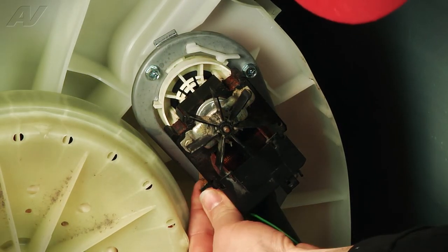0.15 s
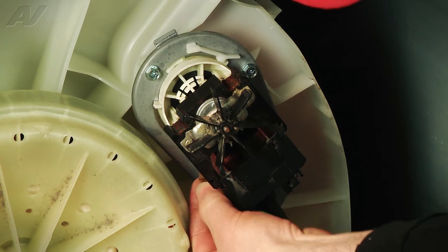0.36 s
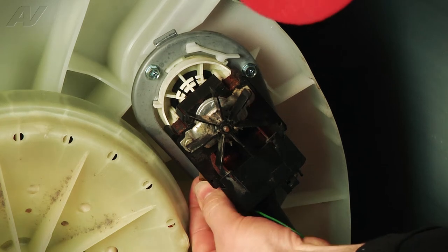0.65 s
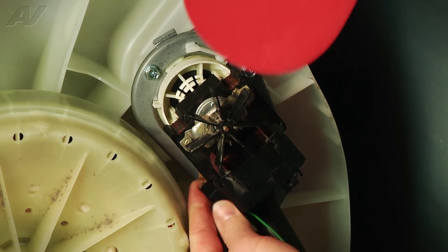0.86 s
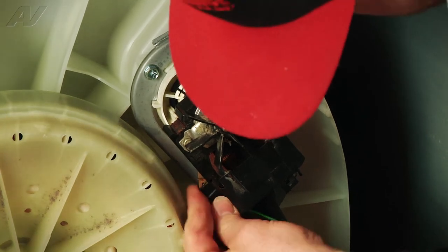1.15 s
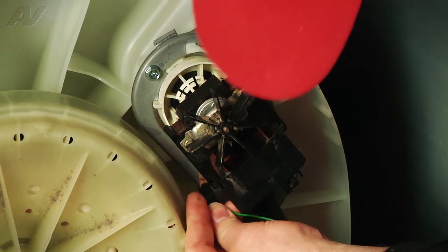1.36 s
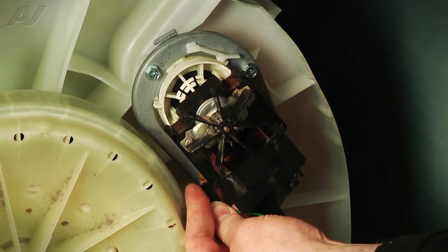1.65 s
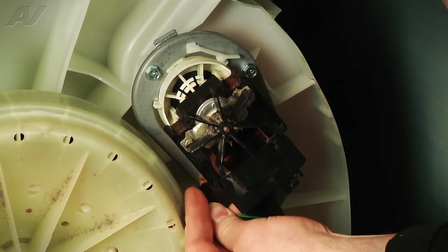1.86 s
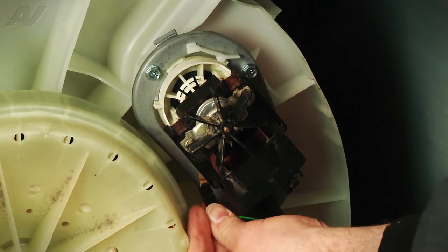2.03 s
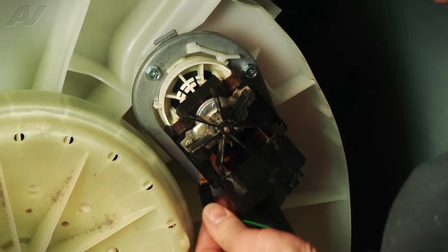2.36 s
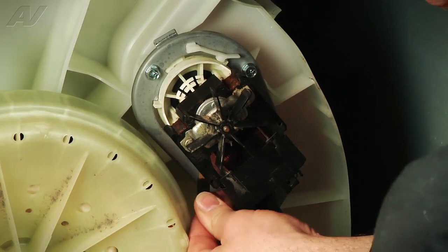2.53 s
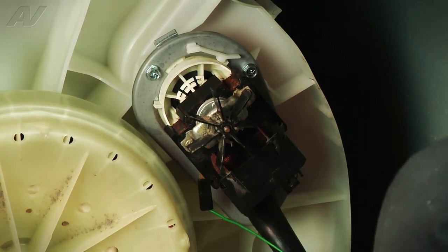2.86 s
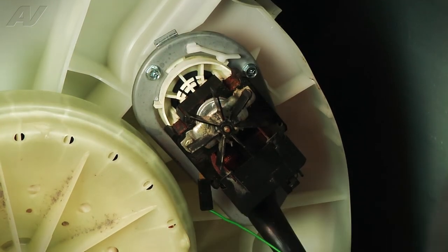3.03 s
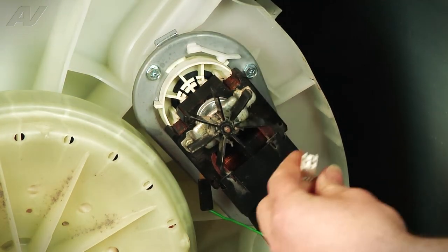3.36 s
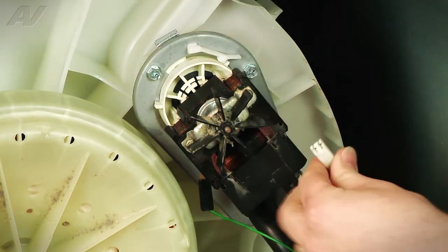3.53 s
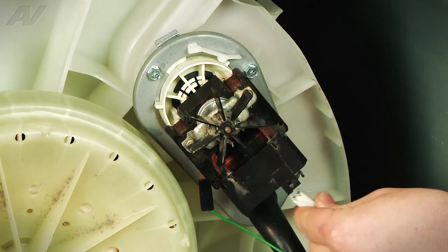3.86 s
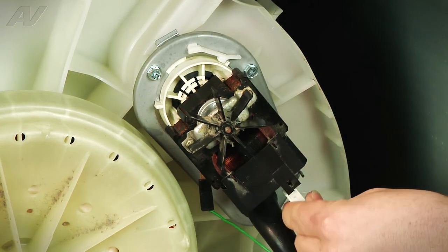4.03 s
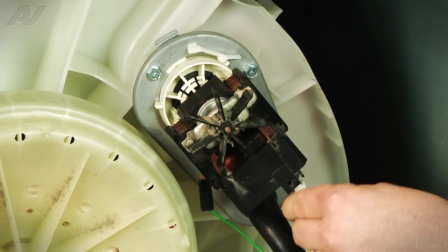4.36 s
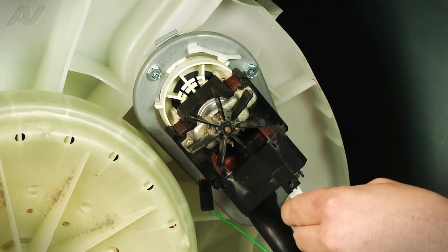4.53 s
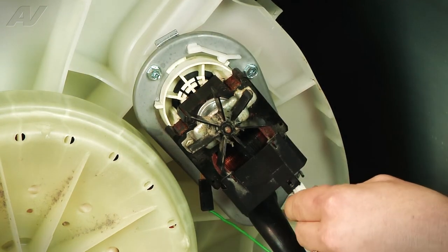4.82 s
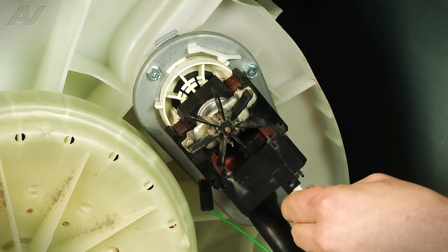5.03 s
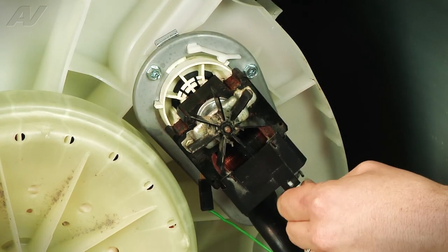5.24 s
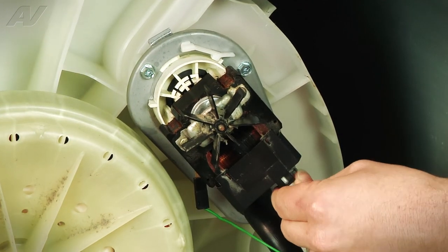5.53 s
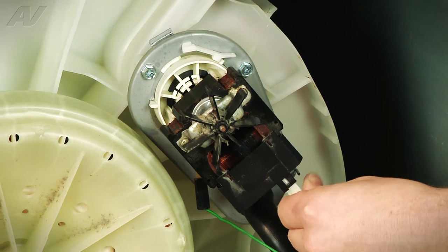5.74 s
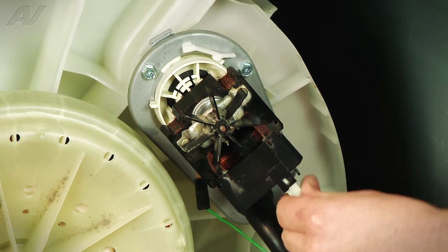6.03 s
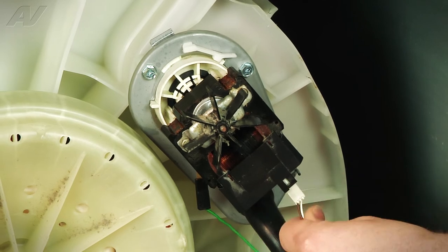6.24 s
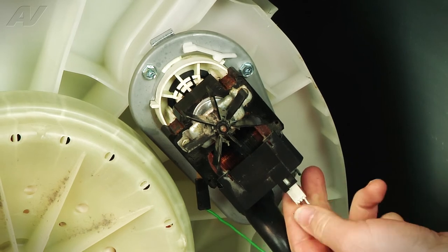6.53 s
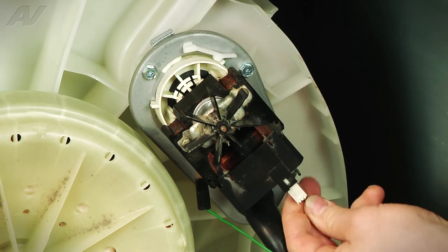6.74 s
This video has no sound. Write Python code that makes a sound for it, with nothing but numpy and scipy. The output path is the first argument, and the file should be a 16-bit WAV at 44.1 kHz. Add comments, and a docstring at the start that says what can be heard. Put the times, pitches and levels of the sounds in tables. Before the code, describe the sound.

Indoors and close-miked, fingers fumble softly at a motor, making the hollow plastic tub rumble and creak. A hard plastic clack stands out early, followed by dry wire ticks and muted bumps. Cloth swishes midway, then the plug knocks repeatedly against the terminal block with short woody thuds and brief metallic ringing. The end is sparse: small scrapes, a few weak clicks, quiet room tone and hiss.

```python
"""Plugging wires into a washing machine motor

A hand pushes plastic wire connectors onto the motor of a washing machine, close to one microphone.
Plugs tick, scrape and knock: short noise bursts and fading tones ring the metal tabs, motor frame and tub.
Pushing adds juddering noise, low groans and an uneven rumble with creaks; dull bumps sink in pitch.
A sleeve swishes as swells of coloured noise, over a quiet room and a steady hiss."""
import sys
import numpy as np
from scipy import signal
from scipy.fft import rfft, irfft, next_fast_len
from scipy.io import wavfile
from scipy.ndimage import map_coordinates

SR = 44100
rng = np.random.default_rng(int(sys.argv[2]) if len(sys.argv) > 2 else 0)


def to_wav(sig):
    """Store sig (one row per channel, or 1-D mono) as 16-bit WAV at the path in sys.argv[1].

    Samples outside -1..1 are clipped; the rate is SR.
    """
    pcm = np.clip(np.atleast_2d(sig), -1, 1) * 32767
    pcm = np.round(pcm).astype(np.int16)
    wavfile.write(sys.argv[1], SR, pcm.T)  # frames by channels


N = 303849  # length in samples

# Levels in the tables are relative settings: each sound applies its own balance on top.
# The plug strikes the terminal block. Each row: start in seconds, clack level in dB, plastic snap level in dB,
# tub thud level in dB, pitch in Hz near which the frame rings most, seconds until the plug seats.
PLUG_KNOCKS = [(0.121, -40.5, -44, -61, 1670, 0.0045), (0.289, -36.5, -52, -58, 620, 0.0054),
               (1.047, -12.5, -17, -35, 1280, .005), (2.343, -39.5, -36.5, -34.5, 620, 0.0054),
               (2.520, -39.5, -41.5, -30, 560, .012), (2.879, -43, -48, -50, 580, 0.0043),
               (4.015, -35.5, -62, -41, 1183, 0.00304), (4.106, -25.5, -49, -35, 1230, 0.0042),
               (4.419, -17, -28.5, -27.5, 1510, .008), (4.571, -38.5, -53, -32, 945, .015),
               (4.745, -24.5, -40.5, -24.5, 1290, 0.0096), (4.824, -37, -47, -31, 1300, .009),
               (4.853, -16, -30, -24.5, 1700, .013), (4.955, -19.5, -42, -28, 1350, .006),
               (5.225, -39, -53, -36, 1290, .012), (5.479, -29.5, -31.5, -32, 700, 0.0076),
               (5.609, -39, -55, -53, 610, 0.0051), (5.724, -37.5, -38, -36.5, 1260, 0.006),
               (6.131, -32.5, -34, -38, 1000, .013), (6.673, -45, -48, -43, 1540, 0.0053),
               (6.82, -55, -67, -66, 1440, .008)]
# Dry ticks of wires and contact tabs. Each row: start in seconds, level in dB, pitch in Hz.
WIRE_TICKS = [(0.122, -29, 6010), (1.912, -22.5, 8640), (2.271, -25.5, 9000), (2.3486, -26, 11200),
              (3.1837, -23.5, 6260), (3.663, -18.5, 6690), (3.7443, -24, 6700), (4.107, -33, 7560),
              (4.543, -34, 11400), (4.587, -30, 12460), (4.8238, -29, 7760), (5.72, -23, 8950),
              (6.1445, -24.5, 10300)]
# The hand shoves the motor. Each row: start in seconds, level in dB, favoured pitch in Hz, length in seconds.
HAND_SHOVES = [(0.182, -34.5, 170, 0.041), (0.424, -20.5, 244, 0.079), (0.458, -26, 159, 0.029),
               (1.27, -26.5, 257, 0.087), (1.323, -30, 150, 0.066), (2.462, -26.5, 302, 0.065),
               (2.744, -34, 256, 0.11), (2.8, -30.5, 298, 0.072), (3.883, -30, 220, 0.036),
               (4.364, -37, 307, 0.069), (5.666, -29.5, 151, 0.044), (6.088, -30, 213, 0.034)]
# Dull bumps close to the microphone. Each row: start in seconds, push level in dB,
# base pitch in Hz (the push sinks from 1.5 times to half of it), seconds to fade by 60 dB, click level in dB.
DULL_BUMPS = [(1.6515, -26, 309, 0.045, -20), (3.349, -16.5, 209, 0.043, -48)]
# The tub gives under pressure. Each row: start in seconds, main swell in seconds, middle pitch in Hz, level in dB.
TUB_GROANS = [(1.369, 0.03, 119.8, -23.5), (1.43, 0.15, 113.7, -24.5), (2.537, 0.07, 123.2, -28.5),
              (3.07, 0.17, 131.8, -38.5), (4.965, .04, 135, -26), (5.487, .06, 122, -27)]
# Plastic slides on plastic. Each row: fastest moment in seconds, rise in seconds, fall in seconds,
# rasp level in dB, fine fizz level in dB.
PLUG_SCRAPES = [(0.449, 0.043, 0.093, -41, -63), (0.51, 0.081, 0.13, -34.5, -60),
                (0.546, 0.048, 0.059, -34, -36), (1.528, .04, 0.18, -52.5, -62),
                (2.535, .02, 0.096, -54, -41.5), (4.547, 0.02, 0.021, -54, -49),
                (4.744, 0.065, 0.012, -52.5, -52), (4.846, 0.027, 0.024, -47, -47),
                (5.255, 0.13, .09, -53, -66), (5.425, 0.029, 0.57, -55.5, -58),
                (5.485, .025, 0.057, -40.5, -37.5), (5.68, 0.067, 0.072, -44.5, -50),
                (6.091, 0.03, 0.17, -48.5, -55)]
# Fingers working on the motor. Each row: time in seconds, effort in dB.
GRIP_EFFORT = [(0.0, -47), (0.75, -45), (1.52, -42), (1.69, -49.5), (2.0, -48), (2.68, -49.5), (2.86, -59),
               (3.13, -49), (3.24, -54.5), (3.76, -45.5), (4.13, -57.5), (4.39, -55.5), (4.55, -45.5),
               (4.81, -56.5), (5.3, -51.5), (5.66, -40), (5.83, -50), (6.89, -54.5)]
# The arm moves and the sleeve swishes. Each row: fastest moment in seconds, seconds to rise from half level,
# seconds to fall to half level, level in dB.
SLEEVE_SWISHES = [(0.5, 0.11, 0.36, -47), (0.95, .17, 0.36, -46), (1.31, 0.17, 0.071, -39.5),
                  (1.48, 0.25, 0.28, -52), (2.13, 0.37, 0.22, -48), (2.83, 0.071, 0.13, -49),
                  (3.498, 0.37, 0.4, -36.5)]

# Ringing tones of the motor frame. Each row: pitch in Hz, strength in dB, seconds to fade by 60 dB.
FRAME_MODES = [(653.5, 0, 0.13), (762, -4, 0.14), (906, -0.5, 0.069), (1108, -2.5, 0.086), (1296, -2, 0.09),
               (1430, -12.5, 0.1), (1488, 0, 0.076), (1555, -4, 0.12), (1633, 3, 0.036), (1710, -12, 0.18),
               (1923, -7, 0.076), (2225, -8.5, 0.11), (2800, -33, 0.066), (3150, -14, 0.04)]
# Ringing tones of the plastic tub. Each row: pitch in Hz, strength in dB, seconds to fade by 60 dB.
TUB_MODES = [(100.4, -3.5, 0.43), (130, 1.5, 0.17), (198.3, -11, 0.26), (262, 2, 0.1), (306.3, -3, 0.18),
             (338.5, -8, 0.11), (387.7, -10, 0.24), (447, -8.5, 0.087), (537, -8, 0.14)]
# Brief ringing of the metal contact tabs. Each row: pitch in Hz, strength in dB, seconds to fade by 60 dB.
TAB_MODES = [(5500, -6, .05), (5874, -5, .05), (6695, -3, .06), (6930, -2, .05), (7105, 0, .06),
             (7537, -1, .055), (8053, -2, .055), (9695, -5, .05), (10420, -5, .05), (12350, -5, .05)]

# Colour of the clack as the plug hits. Each row: frequency in Hz, relative level in dB.
CLACK_COLOUR = [(200, -31), (450, 2.5), (800, 0), (1100, 0.5), (1550, -1), (2100, -9), (2600, -22.5),
                (3300, -15), (4200, -37), (8000, -40)]
# Colour of the plastic snap. Each row: frequency in Hz, relative level in dB.
SNAP_COLOUR = [(800, -19), (2500, 2.5), (4000, -11), (5400, 3), (7300, 7.5), (9000, -4), (12000, -3),
               (16000, -27)]
# Colour of cloth on cloth. Each row: frequency in Hz, relative level in dB.
CLOTH_COLOUR = [(150, -44), (250, -59), (308, 4.5), (354, -2.5), (393, -2), (547, 1.5), (618, -8), (735, 2),
                (1120, -10), (1420, -3), (1850, -8), (3710, -17.5), (7700, -2.5), (10700, -5.5),
                (16000, -16)]
# Colour of the coarse rasp of a slide. Each row: frequency in Hz, relative level in dB.
RASP_COLOUR = [(59, -37), (100, -5), (140, 2.5), (322, -6), (461, 1.5), (691, -7), (768, -12),
               (1080, -10.5), (1760, -10), (2750, -20.5), (4980, -12.5), (6150, -19.5), (11900, -28),
               (16000, -43)]
# Colour of the fine fizz of a slide. Each row: frequency in Hz, relative level in dB.
FIZZ_COLOUR = [(1500, -51), (4000, -19), (7000, -0.5), (11000, 2.5), (13000, -1), (16000, -12)]
# Colour of a shove before its own pitch is favoured. Each row: frequency in Hz, relative level in dB.
SHOVE_COLOUR = [(50, -40), (110, 6), (230, 3.5), (310, 4.5), (480, -0.5), (750, -7), (1500, -20),
                (4000, -26)]
# Colour of the tub rumbling under the fingers. Each row: frequency in Hz, relative level in dB.
RUMBLE_COLOUR = [(30, -62), (60, -29), (90, -4), (118, 3.5), (190, -3.5), (310, -2.5), (520, -12),
                 (800, -18.5), (1500, -25), (3000, -38.5)]
# Colour of skin creaking on plastic. Each row: frequency in Hz, relative level in dB.
CREAK_COLOUR = [(500, -20), (1500, -14), (3000, -13), (5200, 0), (7000, -10), (16000, -28)]
# Colour of the quiet room and the hiss. Each row: frequency in Hz, relative level in dB.
QUIET_COLOUR = [(18, -65), (30, -46), (90, -18), (124, 2.5), (486, -19), (616, -36), (721, -26), (780, -38),
                (1460, -32), (3060, -31), (4190, -47), (7090, -19), (10800, -9.5), (14800, -13),
                (16000, -22)]
# Colours of a bump's click and its buzz. Each row: frequency in Hz, relative level in dB.
BUMP_CLICK_COLOUR = [(200, -3), (1200, 4), (2800, 4), (3600, -25), (4400, -48)]
BUMP_BUZZ_COLOUR = [(200, 2), (1500, -6), (2500, -5), (3400, -16), (4400, -40)]

SEAT_LOSS_DB = 7  # the clack and snap are weaker as the plug seats; the thud is not
SNAP_T60_S, THUD_HZ = 0.066, 294  # fade of the snap by 60 dB; the thud favours tub tones near this pitch
SLIDE_RISE_S, SLIDE_FALL_S = .012, 0.042  # the plug skids briefly around each knock
SLIDE_RASP_DB, SLIDE_FIZZ_DB = -27, -5.5  # skid settings, relative to the clack and to the snap
SWAY_DELAY_S, SWAY_S, SWAY_HZ, SWAY_DB = 0.0094, 0.061, 124.3, -10  # tub sway; dB relative to the thud setting
RELAX_S, RELAX_DB = 0.19, -14.5  # a weaker swell lasts this much longer than the main swing
FAINT_TICKS_PER_S, FAINT_TICK_DB, FAINT_TICK_HZ = 2, -45.5, 6840  # average rate, middle level and middle pitch
PING_DB = -13  # ping of a tick, relative to the tick
SHOVE_RISE_S = .006
MUFFLE_HZ = 3320  # the bumps are cut steeply above this
SWISH_SHAPE = 3.64  # 2 is a bell; higher gives a flatter top and steeper sides
CLOTH_REST_DB = -60  # the cloth never lies quite still
SWISH_SPLIT_HZ, SWISH_DULLING = 4900, 0.69  # treble above the split dies in this share of the fall time
GRIP_UNEVEN_DB = 2  # unevenness of the effort
CREAK_DB, CREAK_SLIPS_PER_S = -22.5, 70  # creak level; slips a second before pauses are cut out
TOP_HZ = 16000  # band limit of the recorder


def amp(db):
    """Turn decibels into a gain."""
    return 10 ** (np.asarray(db) / 20)


def unit(x):
    """Scale a sound to an average (rms) strength of 1."""
    return x / np.sqrt(np.mean(x ** 2) + 1e-20)


def clock(seconds):
    """Give the sample times of a stretch, in seconds."""
    return np.arange(max(int(seconds * SR), 8)) / SR


def curve(rows):
    """Join (seconds, value) rows with straight lines, one value per sample."""
    return np.interp(np.arange(N) / SR, *np.transpose(rows))


def wobble(rate, size=N):
    """Draw a smooth random curve through rate random points a second."""
    points = rng.standard_normal(int(size * rate / SR) + 4)
    return map_coordinates(points, [np.arange(size) * rate / SR])


def colour(x, points):
    """Shape the spectrum by (Hz, dB) points on a log frequency axis, then scale to rms 1."""
    hz, db = np.transpose(points)
    size = next_fast_len(len(x))
    log_hz = np.log(np.fft.rfftfreq(size, 1 / SR) + 1)
    gain = amp(np.interp(log_hz, np.log(hz), db))
    return unit(irfft(rfft(x, size) * gain, size)[:len(x)])


def noise(points, size=N, grain_db=0):
    """Make coloured noise; grain_db lets single tiny slips stand out."""
    grain = amp(grain_db * wobble(2500, size))
    return colour(rng.standard_normal(size) * grain, points)


def fade(t, rise, t60):
    """Rise quickly, then fade by 60 dB every t60 seconds."""
    return (1 - np.exp(-t / max(rise, 1e-5))) * amp(-60 * t / max(t60, 1e-3))


def ring(modes, t, rise, scatter_db, centre_hz=1000, focus_db=0):
    """Ring fading tones; the place of the blow favours those near centre_hz by focus_db an octave."""
    hz, db, t60 = np.transpose(modes)
    scatter = scatter_db * rng.standard_normal(len(hz))
    distance = np.abs(np.log2(hz / centre_hz))
    gain = amp(db + scatter - focus_db * distance)
    total = 0
    for g, f, d in zip(gain, hz, t60):
        total = total + g * np.sin(2 * np.pi * (f * t + rng.random())) * fade(t, rise, d)
    return np.sqrt(2) * total / np.linalg.norm(gain)  # the powers of the tones sum to 1


def add(track, s, sound):
    """Mix a sound into the track at time s."""
    part = track[max(round(s * SR), 0):][:len(sound)]
    part += sound[:len(part)]


def knocks():
    """The plug skids in, strikes, strikes again as it seats, and leaves the tub swaying."""
    out = np.zeros(N)
    for s, clack_db, snap_db, thud_db, hz, seat_s in PLUG_KNOCKS:
        skid = slide(SLIDE_RISE_S, SLIDE_FALL_S, clack_db + SLIDE_RASP_DB, snap_db + SLIDE_FIZZ_DB)
        add(out, s - SLIDE_RISE_S, skid)
        add(out, s, tick(snap_db, hz=7500))  # a contact tab ticks with the first touch
        add(out, s, blow(clack_db, snap_db, thud_db, hz))
        add(out, s + seat_s, blow(clack_db - SEAT_LOSS_DB, snap_db - SEAT_LOSS_DB, thud_db, hz))
        add(out, s + SWAY_DELAY_S, swing(SWAY_S, SWAY_HZ, thud_db + SWAY_DB))
    return out


def blow(clack_db, snap_db, thud_db, clack_hz):
    """The plug snaps, the tabs and the frame ring, and the heavy tub builds up more slowly."""
    t = clock(.35)
    grit = amp(-8.5) * noise(SNAP_COLOUR, len(t), grain_db=3) * fade(t, 0.00025, SNAP_T60_S)
    tabs = amp(-9.5) * ring(TAB_MODES, t, rise=0.00091, scatter_db=4)
    contact_fade = amp(-5.0) * fade(t, 0.00038, 0.018) + amp(-20.5) * fade(t, 0.0018, 0.17)
    contact = noise(CLACK_COLOUR, len(t)) * contact_fade
    frame = amp(-7.5) * ring(FRAME_MODES, t, rise=0.00051, scatter_db=2, centre_hz=clack_hz, focus_db=12.5)
    tub = ring(TUB_MODES, t, rise=0.0039, scatter_db=6.0, centre_hz=THUD_HZ, focus_db=5.0)
    thud = amp(thud_db - 1.5) * tub
    return amp(snap_db) * (grit + tabs) + amp(clack_db) * (contact + frame) + thud


def tick(db, hz):
    """A tiny hard contact: a brief burst of treble, a ping of the part, a faint answer from the tub wall."""
    t = clock(.08)
    burst = noise([(hz / 4, -32), (hz * 0.74, -9), (hz, 0), (hz * 1.08, -8), (hz * 2, -17)], len(t))
    burst_fade = fade(t, 0.0003, 0.0082) + amp(-23) * fade(t, 0.0029, 0.12)  # contact, then tub wall
    ping = np.sin(2 * np.pi * hz * t) * fade(t, 0.00029, 0.013)
    return amp(db - 1) * (burst * burst_fade + amp(PING_DB) * ping)


def slide(rise, fall, db, fizz_db):
    """Dense little slips swell to the fastest point of a slide and stop; the plastic catches unevenly."""
    t = clock(rise + fall)
    speed = np.interp(t, [0, max(rise, .002), t[-1]], [0, 1, 0]) ** 2.1
    catch = amp(2.2 * wobble(220, len(t)))
    rasp = amp(db + 4.5) * noise(RASP_COLOUR, len(t), grain_db=3.5)
    fizz = amp(fizz_db + 0.5) * noise(FIZZ_COLOUR, len(t), grain_db=6.0)
    return speed * catch * (rasp + fizz)


def swing(length, hz, db):
    """A low tone of the tub, wavering in pitch, swells and dies, then swings on weakly as the tub relaxes."""
    t = clock(length + RELAX_S)
    pitch = hz * (1 + 0.051 * wobble(47, len(t)))
    phase = 2 * np.pi * np.cumsum(pitch) / SR
    main = np.sin(np.pi * np.minimum(t / length, 1))
    relaxing = amp(RELAX_DB) * np.sin(np.pi * t / t[-1])
    return amp(db - 2.9) * np.sin(phase) * (main + relaxing)


def scrapes():
    """The plug is dragged over the block in search of its terminals."""
    out = np.zeros(N)
    for s, rise, fall, db, fizz_db in PLUG_SCRAPES:
        add(out, s - rise, slide(rise, fall, db, fizz_db))
    return out


def ticks():
    """The wires give a few clear ticks, and faint ones at random times as they stir."""
    out = np.zeros(N)
    for s, db, hz in WIRE_TICKS:
        add(out, s, tick(db, hz))
    count = int(FAINT_TICKS_PER_S * N / SR)
    for when, size, pitch in rng.random((count, 3)):
        faint = tick(FAINT_TICK_DB + 10 * (size - .5), FAINT_TICK_HZ * 2 ** (pitch - .5))
        add(out, when * N / SR, faint)
    return out


def shoves():
    """Soft skin judders over the motor and shakes the tub, most strongly near the judder's own pitch."""
    out, t = np.zeros(N), clock(.35)
    for s, db, hz, length in HAND_SHOVES:
        push = np.exp(-(t / max(length, .01) * 1.15) ** 2) * (1 - np.exp(-t / SHOVE_RISE_S))
        tone = [(f, level - 4 * abs(np.log2(f / hz))) for f, level in SHOVE_COLOUR]  # 4 dB less an octave
        add(out, s, amp(db - 7.5) * noise(tone, len(t), grain_db=1.0) * push)
    return out


def bumps():
    """One low push that sinks in pitch, with a muffled click and a brief plastic buzz on top."""
    out, t = np.zeros(N), clock(0.084)
    for s, db, hz, t60, click_db in DULL_BUMPS:
        pitch = hz * (0.5 + np.exp(-t / 0.0051))
        push = np.sin(2 * np.pi * np.cumsum(pitch) / SR) * fade(t, 0.0017, t60)
        click = noise(BUMP_CLICK_COLOUR, len(t)) * fade(t, .0001, 0.01)
        buzz = noise(BUMP_BUZZ_COLOUR, len(t)) * fade(t, 0.0049, 0.24)
        add(out, s, amp(db + 5) * push + amp(click_db) * (click + amp(-18.5) * buzz))
    muffle = signal.butter(8, MUFFLE_HZ, fs=SR, output="sos")
    return signal.sosfilt(muffle, out)


def groans():
    """Steady pressure keeps a low tone of the tub swinging for a moment."""
    out = np.zeros(N)
    for s, length, hz, db in TUB_GROANS:
        add(out, s, swing(length, hz, db))
    return out


def grip():
    """Fingers keep the tub rumbling unevenly; the harder they press, the more their skin creaks on the plastic."""
    effort = amp(curve(GRIP_EFFORT) + GRIP_UNEVEN_DB * wobble(25))
    slips = (rng.random(N) < CREAK_SLIPS_PER_S / SR) * rng.random(N)
    slips = slips * np.clip(wobble(8.4), 0, 1)  # the creaks come in spells, with pauses
    rumble = amp(-1) * noise(RUMBLE_COLOUR)
    creak = amp(CREAK_DB) * colour(slips, CREAK_COLOUR)
    return effort * (rumble + creak)


def sleeve():
    """Cloth slides over cloth: each move of the arm is one swell of a fine swish that dulls as it slows."""
    t, cloth = np.arange(N) / SR, noise(CLOTH_COLOUR, grain_db=2.0)
    split = signal.butter(2, SWISH_SPLIT_HZ, fs=SR, output="sos")
    body = signal.sosfiltfilt(split, cloth)
    treble = cloth - body
    out = np.zeros(N)
    for band, fall_share in ((body, 1), (treble, SWISH_DULLING)):
        power = amp(CLOTH_REST_DB) ** 2
        for s, rise, fall, db in SLEEVE_SWISHES:
            away = np.abs(t - s) / np.where(t < s, rise, fall * fall_share)
            power = power + (amp(db) * .5 ** (away ** SWISH_SHAPE)) ** 2
        out += np.sqrt(power) * band
    return out * amp(-0.5 + 0.71 * wobble(30))  # the level flickers slightly


def quiet_room():
    """A quiet room and a steady hiss, made as one coloured noise."""
    return amp(-59.5) * noise(QUIET_COLOUR)


def scene():
    """All sources reach one microphone, which feeds both channels."""
    plugs = knocks() + scrapes() + ticks()
    handling = shoves() + bumps() + groans() + grip()
    mono = plugs + handling + sleeve() + quiet_room()
    return np.array([mono, mono])


def record(dry):
    """The microphone sheds deep bass, and the recorder keeps nothing above its band limit."""
    bass_cut = signal.butter(3, 58, "highpass", fs=SR, output="sos")
    lean = signal.sosfilt(bass_cut, dry)
    keep = np.fft.rfftfreq(N, 1 / SR) < TOP_HZ
    return irfft(rfft(lean) * keep, N)


dry = scene()
out = record(dry)
to_wav(out)
```